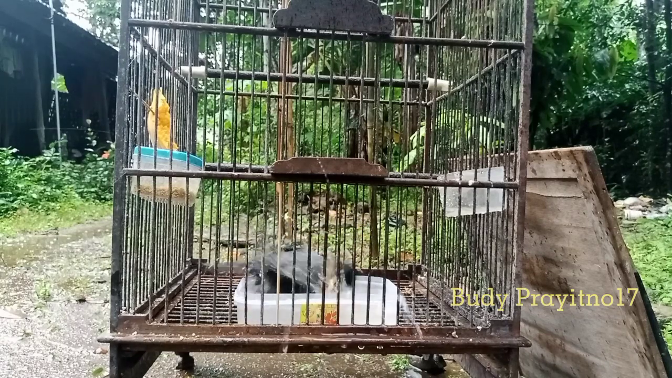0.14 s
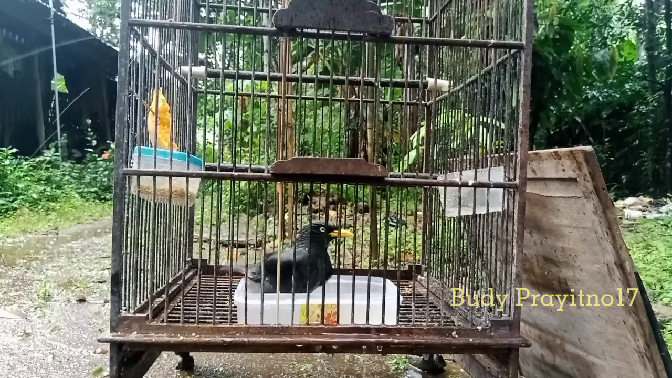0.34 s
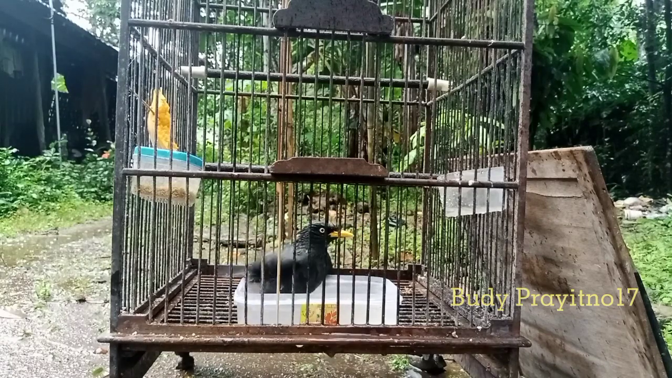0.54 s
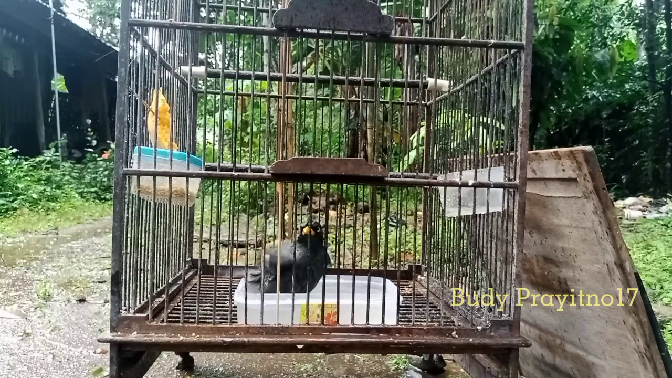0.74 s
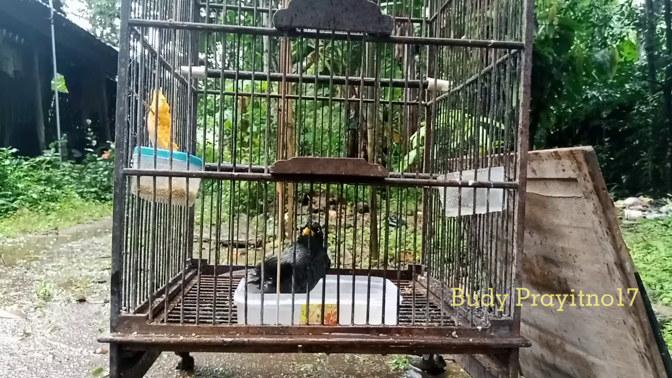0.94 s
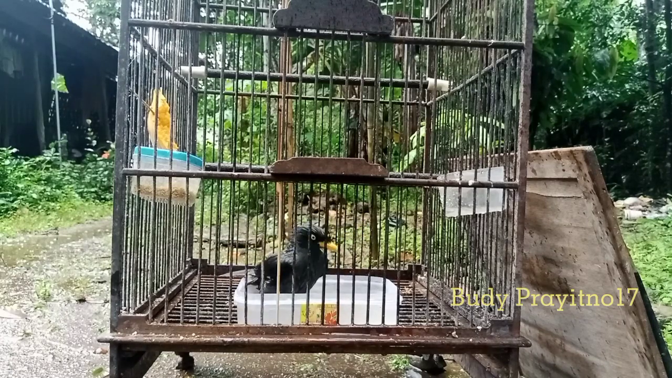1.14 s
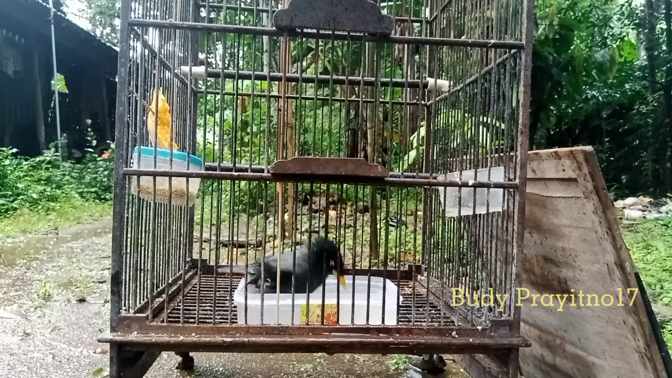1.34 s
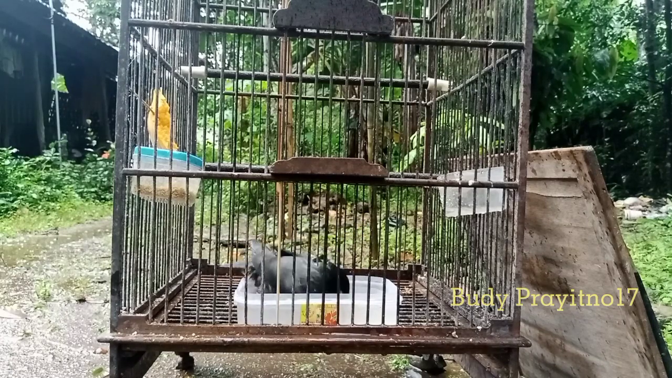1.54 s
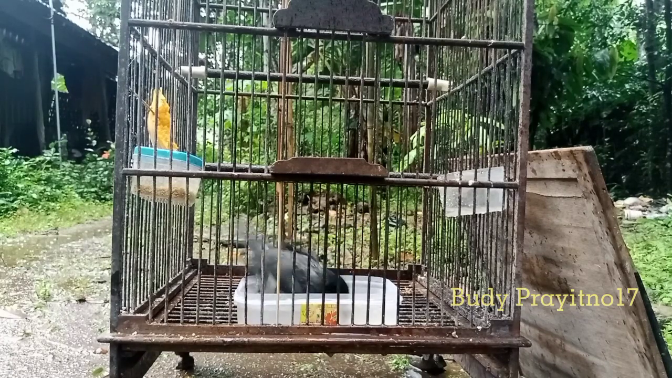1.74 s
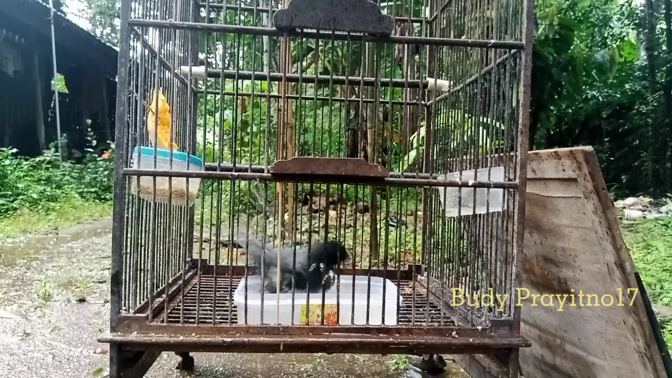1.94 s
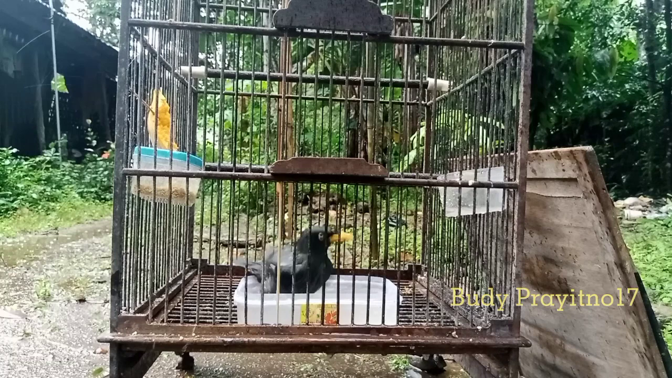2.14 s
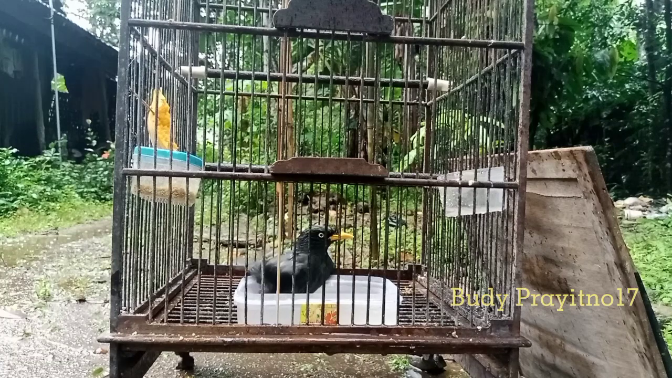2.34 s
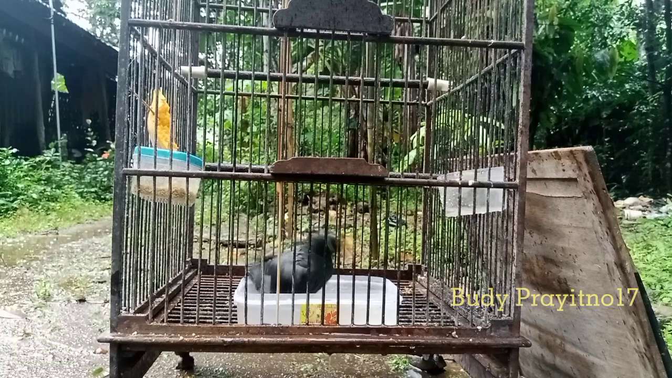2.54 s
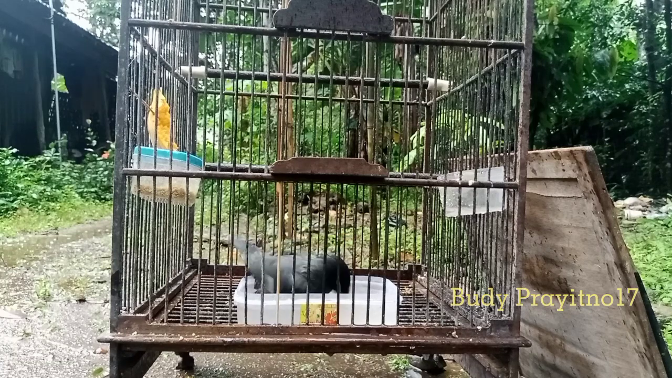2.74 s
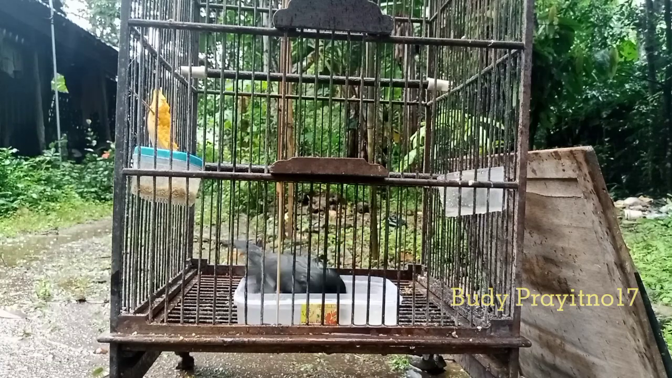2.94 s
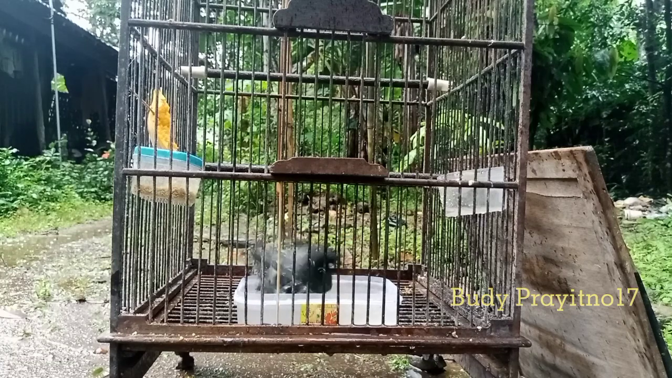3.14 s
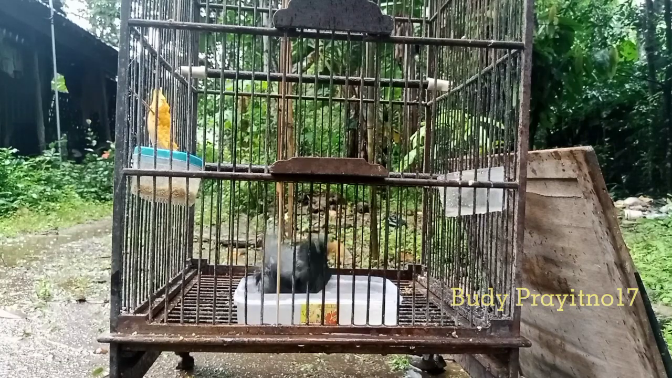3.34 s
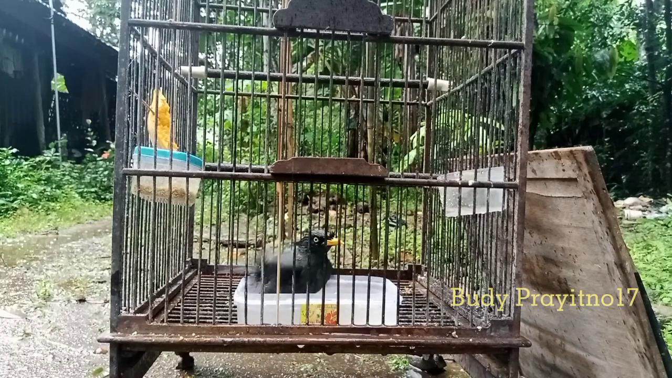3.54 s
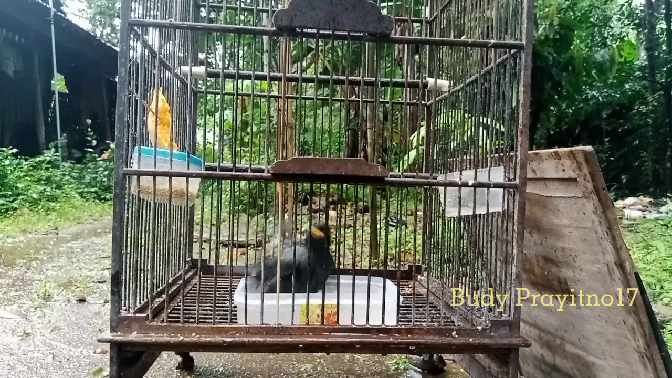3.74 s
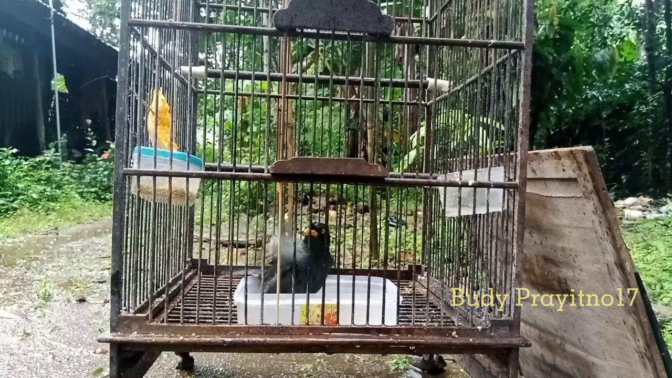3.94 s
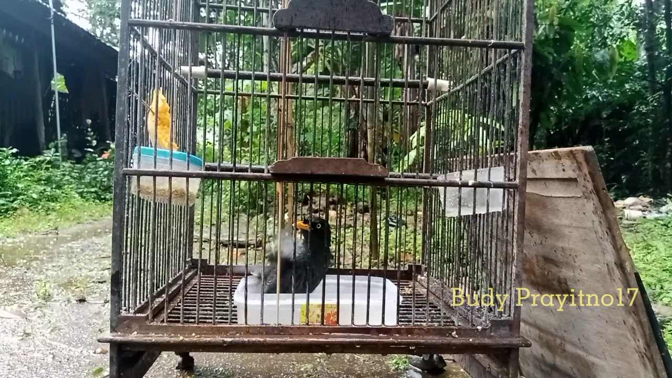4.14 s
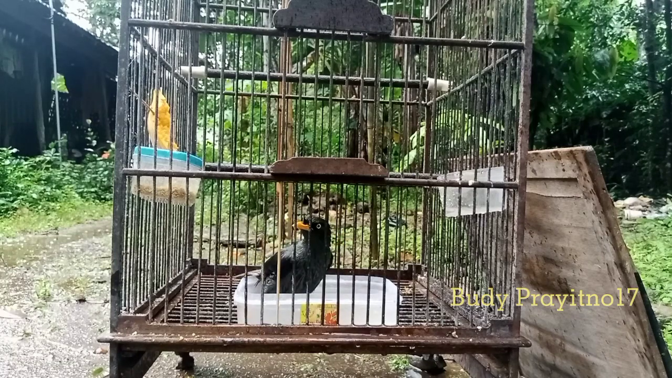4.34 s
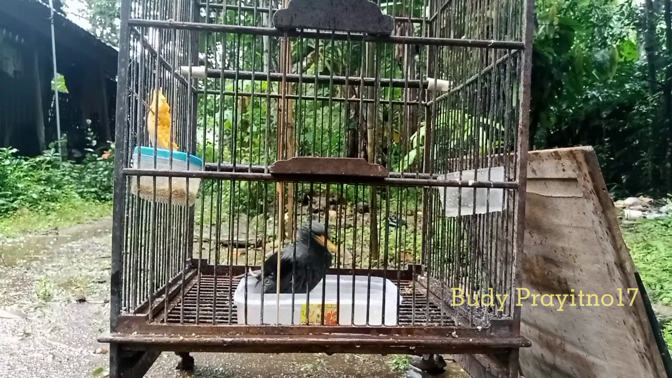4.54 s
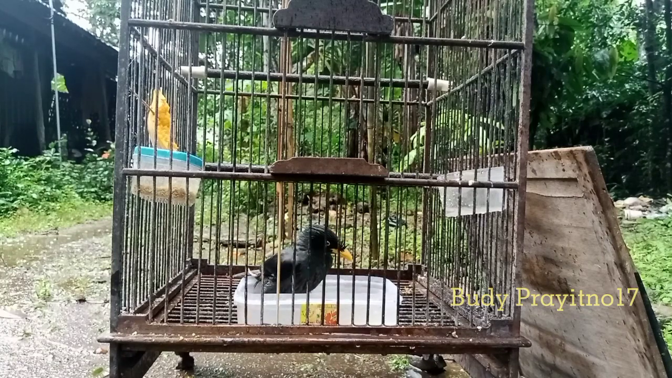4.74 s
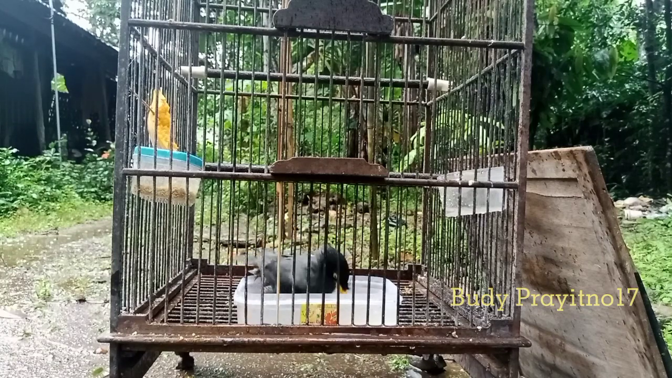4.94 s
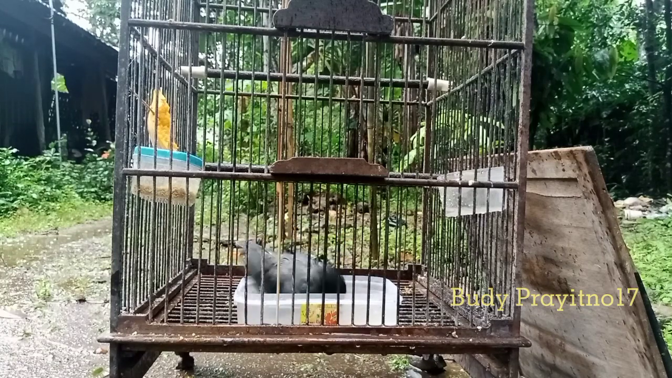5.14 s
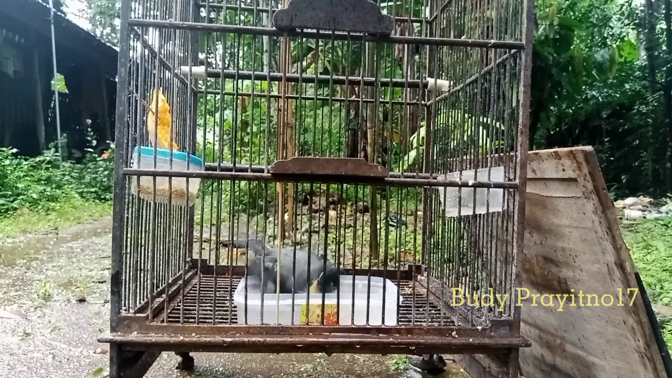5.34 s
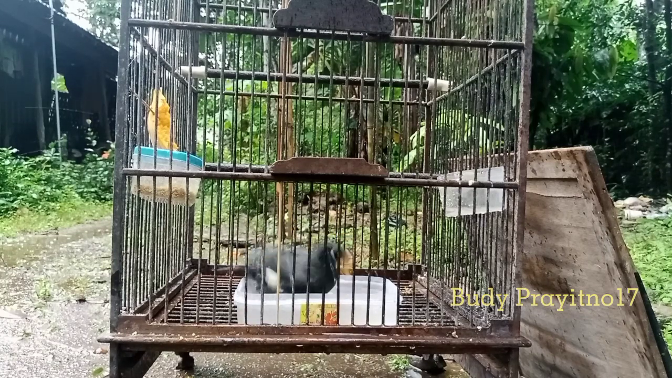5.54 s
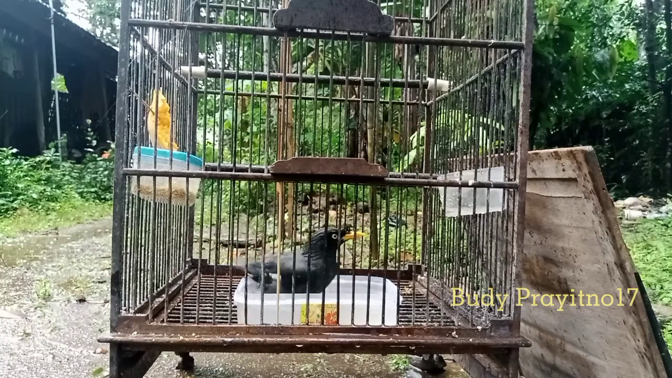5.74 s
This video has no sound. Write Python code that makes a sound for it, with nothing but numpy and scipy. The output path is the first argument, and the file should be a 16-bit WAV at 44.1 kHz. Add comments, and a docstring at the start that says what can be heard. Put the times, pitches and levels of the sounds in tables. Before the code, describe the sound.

A bird splashes and shakes its wet feathers close by, with insects buzzing and a rooster crowing far off.

```python
"""Rural yard: a myna bathes close by, in a plastic tub inside a wire cage.
Its wings slap the water and trap ringing air pockets, drops tick on the cage, wet feathers rustle.
Insects swell and small birds chirp in the trees; two roosters crow and a hen clucks far off.
A breeze rumbles underneath."""
import sys
import numpy as np
from scipy import signal
from scipy.fft import rfft, irfft, next_fast_len
from scipy.io import wavfile
from scipy.ndimage import uniform_filter1d

SR = 44100
rng = np.random.default_rng(int(sys.argv[2]) if len(sys.argv) > 2 else 0)


def inscribe(sig):
    """Save sig as 16-bit PCM at rate SR to the path in sys.argv[1].

    A 1-D sig is mono; a 2-D sig holds one channel per row.
    Samples are clipped to [-1, 1] before scaling.
    """
    pcm = np.round(np.clip(np.atleast_2d(sig).T, -1, 1) * 32767)
    wavfile.write(sys.argv[1], SR, pcm.astype(np.int16))


N = 255339
T = np.arange(N) / SR
BURST_T = T[:int(SR * .25)]

# splash spectrum, with a microphone dip at 13 kHz and ring at 15 kHz: f/Hz, level/dB
SPLASH_SPECTRUM = [(300, -2.5), (1000, -0.5), (1900, 10), (2800, 4), (4500, 5.5), (6800, 4), (9500, -7.5),
                   (11500, -15), (13600, -25), (15000, -11), (16500, -32)]
# rustle and spatter spectrum, with the same microphone dip and ring: f/Hz, level/dB
RUSTLE_SPECTRUM = [(1500, -49), (4000, -9.5), (6500, -2), (9500, -0.5), (11000, -16.5), (13200, -28),
                   (15100, -12), (16000, -42)]


def undb(db):
    """Decibels to gain."""
    return 10 ** (np.asarray(db) / 20)


def unit(x):
    """Scale to rms 1."""
    return x / np.sqrt(np.mean(x ** 2) + 1e-18)


def punch(x):
    """Scale a burst to the energy of 5 ms at rms 1."""
    return x / np.sqrt(np.sum(x ** 2) / (.005 * SR))


def curve(rows):
    """Linear interpolation of (t/s, value) rows."""
    return np.interp(T, *np.transpose(rows))


def colour(x, spectrum):
    """Filter by (f/Hz, level/dB) rows; minimum phase, so no pre-ringing."""
    hz, db = np.transpose(spectrum)
    size = 2 * next_fast_len(len(x))
    bin_hz = np.maximum(np.fft.rfftfreq(size, 1 / SR), 1)
    gain = undb(np.interp(np.log(bin_hz), np.log(hz), db))
    cepstrum = irfft(np.log(gain))
    cepstrum[1:size // 2] *= 2
    cepstrum[size // 2 + 1:] = 0
    return irfft(rfft(x, size) * np.exp(rfft(cepstrum)))[:len(x)]


def band(x, hz, width_hz):
    """One resonance, gain 1 at centre."""
    return signal.lfilter(*signal.iirpeak(hz, hz / width_hz, fs=SR), x)


def highpass(x, hz, order=2):
    """Butterworth low cut."""
    return signal.sosfilt(signal.butter(order, hz, "highpass", fs=SR, output="sos"), x)


def walk(rate_hz):
    """Smooth random drift, rms 1."""
    step = int(SR / rate_hz)
    held = np.repeat(rng.standard_normal(N // step + 1), step)
    return unit(uniform_filter1d(uniform_filter1d(held, step), step)[:N])


def flicker(x, size=1024):
    """Narrow bands swell and fade independently, most in the treble; rms 1."""
    hz, _, cells = signal.stft(x, nperseg=size)
    drift = uniform_filter1d(rng.standard_normal(cells.shape), size=4, axis=0)
    drift = uniform_filter1d(drift, size=4, axis=1)
    depth_db = np.interp(hz, [700, 2500, 6000, 8600, 10000, 12000], [1.5, 3.6, 3.3, 4.6, 3.8, 1.5])
    gain = undb(depth_db[:, None] * unit(drift))
    gain /= np.sqrt(np.mean(gain ** 2, axis=1, keepdims=True))
    return unit(signal.istft(cells * gain, nperseg=size)[1][:N])


def swell(at_s, hold_s, rise_db_per_s, fall_db_per_s):
    """Rise, hold and fall, in dB re the crest."""
    return -rise_db_per_s * np.maximum(at_s - T, 0) - fall_db_per_s * np.maximum(T - at_s - hold_s, 0)


def fade(t60_s):
    """Exponential decay over one burst."""
    return undb(-60 * BURST_T / t60_s)


def onset(delay_s, rise_s):
    """Smooth start of a contact."""
    return np.clip((BURST_T - delay_s) / rise_s, 0, 1) ** 2


def ring(hz, t60_s, delay_s, glide=0):
    """Damped sine; pitch climbs by the fraction glide as it dies."""
    t = np.maximum(BURST_T - delay_s, 0)
    phase = 2 * np.pi * hz * t * (1 + glide * np.minimum(t / t60_s, 1) / 2)
    return np.sin(phase) * undb(-60 * t / t60_s)


def modes(table, delay_s, detune):
    """One blow on (f/Hz, level/dB, t60/s) modes, each randomly detuned."""
    return sum((-1) ** k * undb(db) * ring(hz * (1 + detune * rng.standard_normal()), t60_s, delay_s)
               for k, (hz, db, t60_s) in enumerate(table))


def grains(size, spread_db):
    """Dense clicks of very unequal size."""
    return unit(rng.standard_normal(size) * undb(spread_db * np.minimum(rng.exponential(size=size), 6)))


def add(track, at_s, sound):
    """Mix a sound into a track."""
    i = max(int(at_s * SR), 0)
    track[i:i + len(sound)] += sound[:N - i]


def outdoors(x, t60_s, wet_db):
    """Direct sound plus duller scatter from trees and walls."""
    t = T[:SR]
    tail = rng.standard_normal(SR) * undb(-60 * t / t60_s) * (t > .006)
    tail = colour(tail / np.linalg.norm(tail), [(2000, 0), (5000, -4), (9000, -12), (14000, -18)])
    return x + undb(wet_db) * signal.fftconvolve(x, tail)[:N]


def breeze():
    """Gusts rumble low and buffet at random, over a faint wavering drone."""
    # gust strength: t/s, level/dB
    gusts = [(0.0, -44.6), (0.06, -38), (0.96, -38.5), (1.05, -42), (1.35, -36.0), (1.56, -42.0),
             (2.31, -41), (2.4, -47.5), (3.6, -40), (3.75, -49), (4.14, -38.5), (4.23, -44), (5.1, -40),
             (5.16, -50.5), (5.37, -36.5), (5.43, -44.5), (5.64, -36), (5.76, -38)]
    # eddy spectrum: f/Hz, level/dB
    rumble = [(15, -69), (25, -8), (38, -28), (71, 3), (145, 3.5), (197, 0), (262, -11), (348, -22),
              (420, -41), (550, -60), (920, -120)]
    # drone strength: t/s, level/dB
    drone_levels = [(0, -69), (.35, -44), (.55, -36.5), (.85, -39.5), (1.05, -61), (1.4, -40), (1.7, -55.5),
                    (5.79, -92)]
    buffet_db, drone_hz = 3, 156
    eddies = colour(rng.standard_normal(N), rumble)
    eddies /= np.sqrt(uniform_filter1d(eddies ** 2, SR // 12))  # only gusts and buffets set the swell
    lumps = walk(rate_hz=24)
    buffets = unit(undb(buffet_db * unit(lumps - uniform_filter1d(lumps, SR // 4))))
    drone = np.sin(2 * np.pi * np.cumsum(drone_hz * (1 + .01 * walk(rate_hz=12))) / SR)
    return eddies * buffets * undb(curve(gusts)) + drone * undb(curve(drone_levels))


def yard():
    """Leaves and distant life merge into a softly flickering hiss."""
    # distant hiss, with the 15 kHz microphone ring: f/Hz, level/dB
    spectrum = [(100, 2), (300, 3.5), (450, 2), (800, 1.5), (1300, -3.5), (1900, -3), (2900, -2),
                (4400, -3), (6100, 1.5), (7600, -10.5), (9300, -9.5), (11300, -24.5), (13700, -28.5),
                (15100, -16), (16000, -52)]
    hiss = flicker(colour(rng.standard_normal(N), spectrum))
    return hiss * undb(-47.5 + 1.34 * walk(rate_hz=4.71))


def insects():
    """Many insects rasp in one narrow band; the chorus builds slowly, holds and falls away."""
    # chorus crests: t/s, hold/s, level/dB, fall/(dB/s)
    crests = [(0.044, 0.43, -41, 70), (1.6, 0.43, -42, 90), (3.257, 0.25, -41.5, 18),
              (4.743, 0.15, -43, 11), (5.55, 0.2, -43.5, 35)]
    rise_db_per_s = 12.5
    swells_db = [db + swell(at_s, hold_s, rise_db_per_s, fall) for at_s, hold_s, db, fall in crests]
    rasp = rng.standard_normal(N) * undb(walk(rate_hz=60))
    chorus = band(band(rasp, hz=6700, width_hz=410), hz=6736, width_hz=440)
    return unit(chorus) * undb(np.max(swells_db, axis=0))


def shimmer():
    """Faint, short, gliding tones at random pitches overlap into a shimmer."""
    # tone level by pitch: f/Hz, level/dB
    spectrum = [(1100, -65), (1900, -61), (2900, -57), (4400, -55.5), (6000, -54), (7700, -59.5),
                (9200, -58), (10200, -73.5)]
    tones_per_s, tone_s, spread_db, max_glide_hz_per_s = 330, .02, 6, 1400
    pitch_hz, pitch_db = np.transpose(spectrum)
    out = np.zeros(N)
    t = T[:SR // 10] - T[SR // 20]
    for when, height, size, span, slide in rng.random((int(tones_per_s * T[-1]), 5)):
        hz = pitch_hz[0] + height * (pitch_hz[-1] - pitch_hz[0])
        level_db = np.interp(hz, pitch_hz, pitch_db) + spread_db * (2 * size - 1)
        glide_hz_per_s = max_glide_hz_per_s * (2 * slide - 1)
        tone = np.sin(2 * np.pi * (hz + glide_hz_per_s * t / 2) * t)
        envelope = np.exp(-(2 * t / (tone_s * (.5 + span))) ** 2)
        add(out, when * T[-1] + t[0], undb(level_db) * envelope * tone)
    return outdoors(out, t60_s=.23, wet_db=-3)


def voice(hz, level_db, harmonics_db, jitter):
    """A bird's voice: harmonics on an unsteady pitch."""
    phase = 2 * np.pi * np.cumsum(hz * (1 + jitter * walk(rate_hz=120))) / SR
    tone = sum(undb(db) * np.sin(k * phase) for k, db in enumerate(harmonics_db, 1))
    return np.sqrt(2) * undb(level_db) * tone


def syllables(rows, harmonics_db, jitter):
    """Each syllable starts quickly, glides and dies away; its level flutters with the rasp."""
    attack_s, release_s, flutter_db = .013, .023, 3
    out = np.zeros(N)
    for at_s, length_s, start_hz, end_hz, level_db in rows:
        hz = np.interp(T, [at_s, at_s + length_s], [start_hz, end_hz])
        attack = np.clip((T - at_s) / attack_s + .5, 0, 1)
        release = np.exp(-np.clip(T - at_s - length_s, 0, 1) / release_s)
        out += attack * release * voice(hz, level_db + flutter_db * walk(rate_hz=90), harmonics_db, jitter)
    return out


def chickens():
    """Two roosters and a hen across the yard; distance leaves only their lower harmonics."""
    # rooster's syllables: t/s, length/s, start f/Hz, end f/Hz, level/dB
    crow = [(3.61, 0.042, 705, 706, -41), (4.125, 0.14, 691.4, 700, -46), (4.43, 0.077, 685, 750, -44.5),
            (4.525, .05, 697, 693, -40), (4.61, 0.115, 684, 726.2, -45), (4.745, 0.11, 702, 689, -38.5),
            (4.885, 0.07, 596, 613.6, -43.5)]
    # farther rooster's held notes: columns as crow
    far_crow = [(0, 0.28, 839, 840, -53), (3.09, .09, 888, 882, -43.5)]
    # hen's sagging note after a cluck: columns as crow
    hen_note = [(5.24, 0.066, 514, 503, -49)]
    # its harmonics: level/dB
    hen_harmonics_db = [3, 1.5, -8, 0.5, -12, -20, -2.5]
    # hen's clucks: t/s, length/s, f/Hz, level/dB, second harmonic/dB
    clucks = [(4.723, 0.052, 428, -52, 12), (5.242, 0.053, 513.6, -39.5, 3.5),
              (5.407, 0.035, 425.6, -47.5, 13)]
    rooster = syllables(crow, harmonics_db=[-1, -27], jitter=.033)
    far_rooster = syllables(far_crow, harmonics_db=[-17, -3, -11], jitter=.0156)
    hen = syllables(hen_note, hen_harmonics_db, jitter=.022)
    for at_s, length_s, hz, level_db, second_db in clucks:
        envelope = np.exp(-(3 * (T - at_s) / length_s) ** 2)
        hen += envelope * voice(hz, level_db, [0, second_db, -16], jitter=.024)
    roosters = outdoors(rooster + far_rooster, t60_s=.71, wet_db=-4)
    return roosters + outdoors(hen, t60_s=.52, wet_db=-10.5)


def stirring_db():
    """Water motion: quickly stirred, slower to settle."""
    # the bird stirs the water: t/s, hold/s, level/dB
    stirs = [(0.138, 0.14, -46), (.52, .06, -54.5), (.8, .35, -53.5), (1.954, 0.12, -52.5),
             (3.194, 0.97, -54), (4.496, 0.34, -56.5), (5.42, 0.4, -50.5)]
    return np.max([db + swell(at_s, hold_s, rise_db_per_s=92, fall_db_per_s=45)
                   for at_s, hold_s, db in stirs], axis=0)


def slosh():
    """Tiny bubbles of many sizes fizz in the stirred water."""
    fizz = np.zeros(N)
    for hz in np.geomspace(1900, 5800, num=8):
        width_hz = .6 * hz
        fizz += band(band(grains(N, spread_db=2.5), hz, width_hz), hz, width_hz) / np.sqrt(hz)
    return flicker(fizz) * undb(stirring_db())


def drops():
    """Flung drops tick on bars and rim; fine ones fall at random, louder while the water is stirred."""
    # loudest drops: t/s, level/dB, ring f/Hz
    loud = [(0.1461, -35, 7500), (0.2357, -35.5, 7430), (0.2457, -37, 8700), (1.8675, -43.5, 8600),
            (1.9678, -38, 9100), (1.9966, -36, 7640), (2.1798, -25, 7940), (2.734, -43.5, 7800),
            (3.322, -40, 8900), (3.433, -33.5, 7640), (5.5606, -34, 6940), (5.6444, -35, 7400),
            (5.7765, -41, 7560)]
    fine_per_s, fine_db, spread_db, fine_hz, delay_s = 13, -48.5, 3, 8560, .0006
    stir_db = stirring_db()
    follow_db = .8 * (stir_db - stir_db.max())
    out, fine = np.zeros(N), []
    for when, size, height in rng.random((int(fine_per_s * T[-1]), 3)):
        level_db = fine_db + follow_db[int(when * N)] + spread_db * (2 * size - 1)
        fine.append((when * T[-1], level_db, fine_hz * (1 + .11 * (2 * height - 1))))
    for at_s, level_db, hz in loud + fine:
        tick = ring(hz, t60_s=.003, delay_s=delay_s) * onset(delay_s, rise_s=.00032)
        burst = rng.standard_normal(len(BURST_T)) * onset(delay_s, rise_s=.0005) * fade(t60_s=.018)
        spatter = colour(burst, RUSTLE_SPECTRUM)
        add(out, at_s, undb(level_db) * (punch(tick) + undb(-6) * punch(spatter)))
    return out


def pocket(hz, t60_s, delay_s):
    """Trapped air rings and rises a little; it radiates almost nothing below its own pitch."""
    return highpass(ring(hz, t60_s, delay_s, glide=.09), 1.24 * hz, order=3)


def crack(delay_s, tilt_db):
    """The blow rings briefly and breaks the surface; a flatter, softer one is duller."""
    # ringing modes of the splash, with a thin 15 kHz microphone ring: f/Hz, level/dB, t60/s
    ring_modes = [(4370, 5, 0.0062), (5700, 0, .006), (6550, 3.5, 0.011), (8000, 3, 0.0087),
                  (9120, 8.5, 0.0031), (10500, -2, 0.0047), (12300, 0, 0.0027), (15000, -11, .006)]
    knock = modes(ring_modes, delay_s, detune=.02) * onset(delay_s, rise_s=.00015)
    burst = rng.standard_normal(len(BURST_T)) * onset(delay_s, rise_s=.0004) * fade(t60_s=.02)
    blow = undb(2) * punch(knock) + undb(1) * punch(colour(burst, SPLASH_SPECTRUM))
    return colour(blow, [(800, -10.5), (1800, -5), (4300, -4), (10000, tilt_db)])


def spray(delay_s):
    """Scattered water falls back; the finest, brightest drops are gone first."""
    patter = grains(len(BURST_T), spread_db=2) * onset(delay_s, rise_s=.002)
    coarse = colour(patter * fade(t60_s=.17), [(3000, -2), (7000, -4), (11000, 1)])
    fine = highpass(patter * fade(t60_s=.04), hz=5000)
    return colour(coarse + undb(-4) * fine, SPLASH_SPECTRUM)


def slaps():
    """A wing cracks on the water and traps air pockets; the tub thuds and spray follows."""
    # wing slaps: t/s, level/dB, small pocket f/Hz, large pocket f/Hz,
    # relative level/dB of (small pocket, large pocket, crack, spray, thud), treble tilt/dB
    hits = [(0.1914, -16, 3010, 1760, -3, -3, -3.5, -13, -28, -8.5),
            (0.2855, -12.5, 2610, 2386, -7, -11, -3, -28, -33, 10),
            (2.029, -21, 2500, 2130, -4, -3, 3, -7, -16.5, 5.5),
            (3.242, -25.5, 2620, 1730, -3.5, -19, 2.5, -3, -15.5, 3),
            (5.476, -30, 2061, 2160, -20, -2.5, -1, -3, -29, -6),
            (5.488, -34, 2560, 1990, -4, -19, -8, -22, -27, -4),
            (5.5013, -35, 2200, 2180, 0.5, -11, -8, -4, -23, -12),
            (5.5777, -20, 2550, 1300, -5.5, -11, -2, -6.5, -14, -14.5),
            (5.599, -23, 2270, 1760, -9, -7.5, -5, -16, -15, -10)]
    # fragments of the large pocket: pitch ratio, lag/s, level/dB
    fragments = [(1.1, 0.00094, -2.5), (1.027, 0.00074, -3.5), (0.796, 0.0028, -9)]
    # modes of the tub's thin walls: f/Hz, level/dB, t60/s
    wall_modes = [(459, -10, 0.35), (544, 4, 0.076), (729, 3, 0.18), (850, -8, 0.13), (980, -17, 0.16),
                  (1367, 0.5, 0.095)]
    out, delay_s = np.zeros(N), .0005
    for at_s, level_db, small_hz, large_hz, *mix_db, tilt_db in hits:
        small = pocket(small_hz, t60_s=.014, delay_s=delay_s)
        large = sum(undb(db) * punch(pocket(large_hz * ratio, t60_s=.015, delay_s=delay_s + lag_s))
                    for ratio, lag_s, db in fragments)
        impact = crack(delay_s, tilt_db)
        thud = modes(wall_modes, delay_s, detune=.0556) * onset(delay_s, rise_s=.0033)
        parts = [small, large, impact, spray(delay_s), thud]
        add(out, at_s, undb(level_db) * sum(undb(db) * punch(part) for part, db in zip(parts, mix_db)))
    return out


def chirps():
    """Small birds' short warbled notes, smeared by the trees."""
    # chirps: t/s, length/s, f/Hz, level/dB
    notes = [(0.505, 0.056, 2890, -51), (0.716, 0.066, 3560, -52), (0.837, 0.14, 4340, -50.5),
             (.93, 0.066, 4040, -50), (1.076, 0.12, 4400, -50.5), (1.147, .1, 4250, -53),
             (3.197, 0.015, 4300, -37.5)]
    out = np.zeros(N)
    for at_s, length_s, hz, level_db in notes:
        envelope = np.exp(-(2 * (T - at_s) / length_s) ** 2)
        out += envelope * voice(hz, level_db, harmonics_db=[0], jitter=.05)
    return outdoors(out, t60_s=.47, wet_db=2.5)


def strokes():
    """A wing shake builds, holds and stops; a light upstroke leads each beat."""
    # wing shakes: first beat t/s, last beat t/s (last < first: one weak beat)
    shakes = [(0.7327, 0.83), (1.055, 0.98), (3.657, 4.186)]
    edge_db, top_db, build_db_per_s, stop_db_per_s = -45, -33.5, 80, 170
    beats_per_s, upstroke_lead_s, upstroke_db = 13.2, .018, -43.5
    first_body_db, soak_db_per_s = -5, 17.5  # the rustle gains body as the feathers soak
    for first_s, last_s in shakes:
        beats = 1 + max(round((last_s - first_s) * beats_per_s), 0)
        for at_s in np.linspace(first_s, last_s, beats):
            effort_db = min(build_db_per_s * (at_s - first_s), stop_db_per_s * (last_s - at_s))
            body_db = first_body_db + soak_db_per_s * (at_s - first_s)
            yield at_s - upstroke_lead_s, upstroke_db, body_db
            yield at_s, min(edge_db + effort_db, top_db), body_db


def flicks():
    """Wet feathers brush together at each stroke: a grainy rustle swells, snaps and dies away."""
    out, lead_s = np.zeros(N), .012
    t = BURST_T - lead_s - .001
    snap = np.exp(-np.abs(t) / np.where(t < 0, .001, .003))
    brush = np.exp(-np.abs(t) / np.where(t < 0, .004, .012))
    envelope = snap + .77 * brush
    for at_s, level_db, body_db in strokes():
        treble = colour(grains(len(t), spread_db=.8) * envelope, RUSTLE_SPECTRUM)
        coarse = grains(len(t), spread_db=2) * envelope
        body = band(band(coarse, hz=4700, width_hz=3700), hz=3700, width_hz=4200)
        rustle = punch(treble) + undb(body_db) * punch(body)
        add(out, at_s - lead_s, undb(level_db + rng.standard_normal()) * rustle)
    return out


def scene():
    """Bath close by, yard behind; two identical channels."""
    bath = outdoors(slaps() + drops() + flicks(), t60_s=.2, wet_db=-16)
    mono = bath + slosh() + insects() + chirps() + shimmer() + chickens() + breeze() + yard()
    return np.array([mono, mono])


def record(dry):
    """Thin the deepest bass, round the loudest peaks, cut the top."""
    top_hz = 15900
    limited = np.tanh(highpass(dry, hz=38))
    return signal.sosfilt(signal.ellip(8, .2, 70, top_hz, fs=SR, output="sos"), limited)


dry = scene()
out = record(dry)
inscribe(out)
```